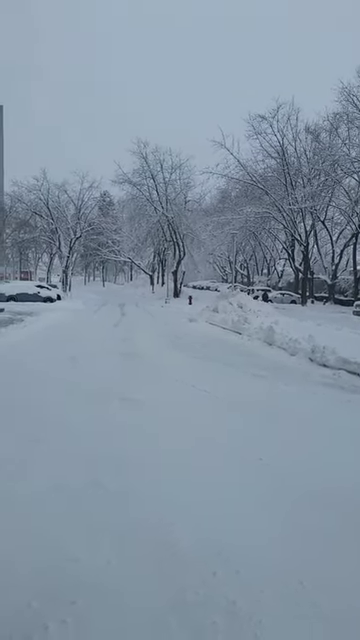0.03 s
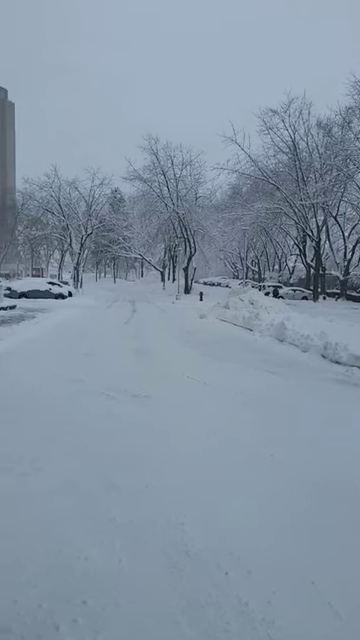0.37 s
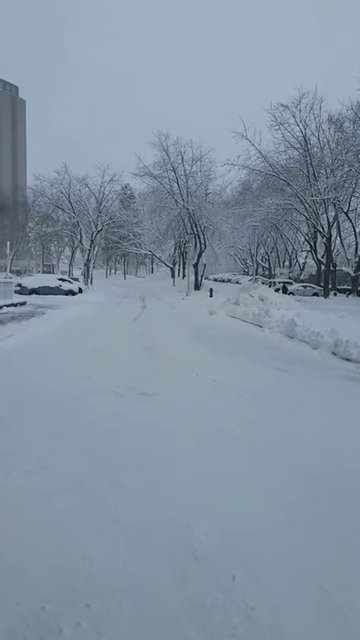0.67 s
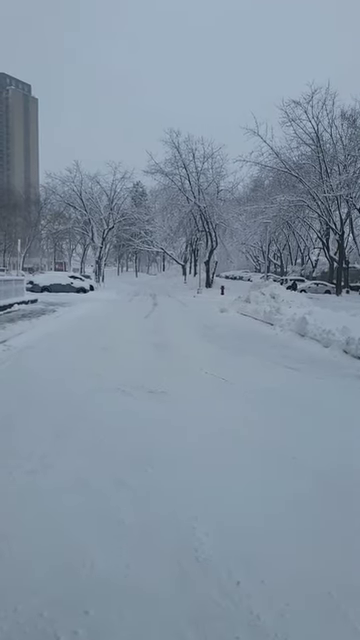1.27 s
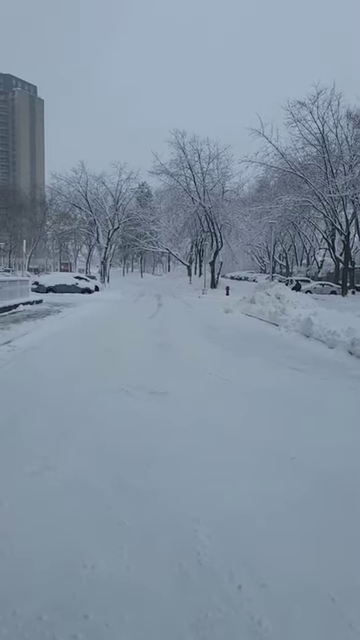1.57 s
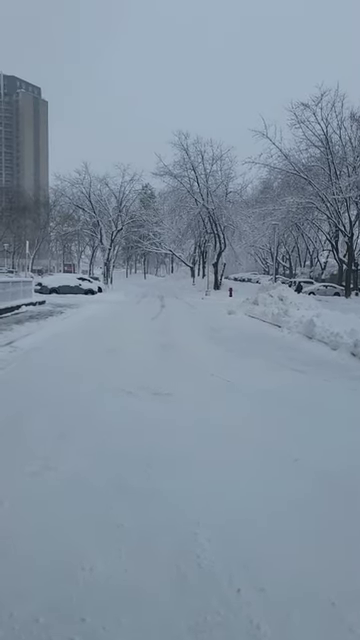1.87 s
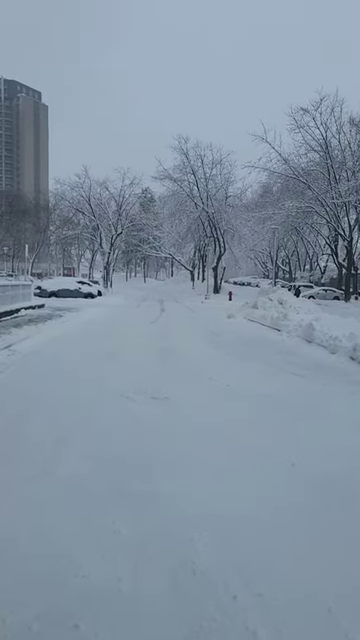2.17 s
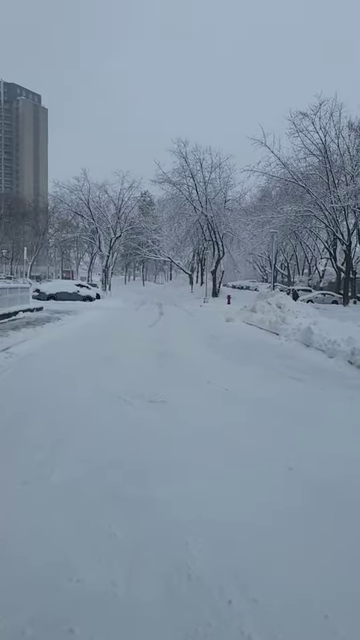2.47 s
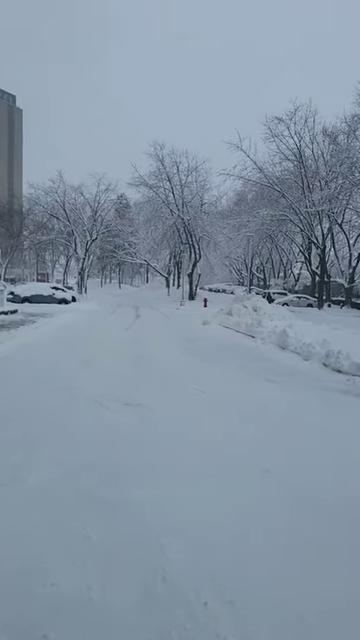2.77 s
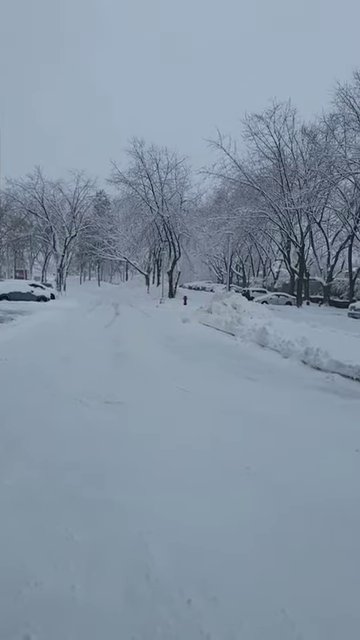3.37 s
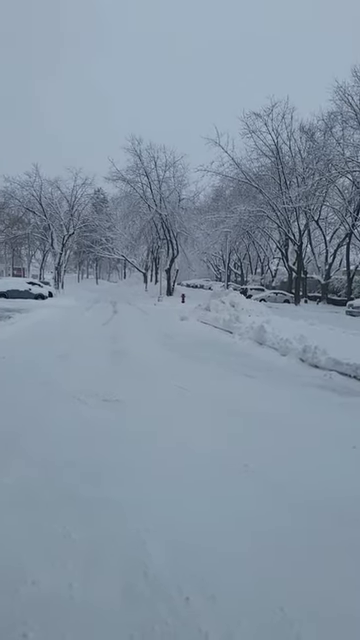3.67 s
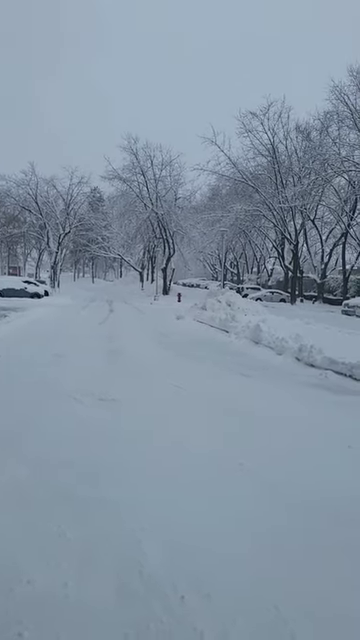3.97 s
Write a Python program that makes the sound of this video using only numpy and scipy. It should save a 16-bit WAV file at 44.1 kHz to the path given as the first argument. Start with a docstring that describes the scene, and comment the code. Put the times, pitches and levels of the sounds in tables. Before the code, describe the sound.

Wind buffets the microphone outdoors with a deep, uneven rumble and a rush that brightens in each gust. An opening gust settles, a faint double tick sounds close on the left, and later the wind swells again.

```python
"""Wind blows across a hand-held microphone on an open, snow-covered street.
Small eddies at the two ports make a rush, stronger on the windward left, that brightens in each gust.
Middle-sized eddies boom on the left; large ones reach both ports as a low rumble with short buffets.
A faint microphone hiss lies beneath, and one soft double tick sounds close by on the left."""
import sys
import numpy as np
from scipy import signal
from scipy.fft import rfft, irfft
from scipy.io import wavfile
from scipy.ndimage import uniform_filter1d

SR = 44100
rng = np.random.default_rng(int(sys.argv[2]) if len(sys.argv) > 2 else 0)


def store_wav(level_fs):
    """Save 16-bit WAV to argv[1]."""
    pcm = np.round(np.clip(np.atleast_2d(level_fs), -1, 1) * 32767)
    wavfile.write(sys.argv[1], SR, pcm.T.astype(np.int16))


N = 176400
T = np.arange(N) / SR
HZ = np.maximum(np.arange(N // 2 + 1) * SR / N, 1)
LEFT_ONLY = np.array([[1], [0]])

# wind strength at each port: (time [s], level [dB])
WIND_LEFT = [(0, 3.5), (.16, 4), (.42, 5), (.625, 2.5), (.648, -1), (.78, 0), (.97, -1), (1.2, 1.4),
             (1.4, .3), (1.6, -0.8), (1.86, -1), (2.03, -2.5), (2.28, -0.7), (2.52, 1.8), (2.64, -0.4),
             (2.86, 1.4), (2.97, 5), (3.12, 5.5), (3.22, 4.5), (3.28, 2.3), (3.42, 1.5), (3.49, 1.6),
             (3.68, -0.2), (4, 0.8)]
WIND_RIGHT = [(0, 4.8), (.25, 3.5), (.47, 3), (.8, 0), (1.4, 0), (1.85, -1), (2.2, -2), (2.5, -0.5),
              (3.12, -1), (3.55, -2), (3.8, 0.1), (4, 1.5)]
# tone of the rush with the wind at 0 dB: (frequency [Hz], left [dB/Hz], right [dB/Hz])
RUSH_SPECTRUM = [(66, -56, -56), (132, -47, -52), (216, -48.5, -48.5), (250, -49.5, -53.5),
                 (390, -48.5, -56), (477, -52.5, -61), (591, -58, -66.5), (694, -58.5, -70),
                 (958, -67, -75.5), (1460, -74, -85), (2126, -78.5, -90.5), (3340, -90, -101.6),
                 (4600, -94.5, -105.2), (5140, -98.5, -109), (5970, -106.5, -116.5), (9400, -119.5, -128),
                 (15000, -130, -138)]
# how hard each band rides the wind: (frequency [Hz], response [dB per dB of wind])
GUST_RESPONSE = [(125, -0.3), (400, 0.63), (800, 1.09), (2000, 1.06), (4000, 1.65), (8000, 1.5)]
# how alike the wind sounds at the two ports: (frequency [Hz], correlation [0 to 1])
PORT_CORRELATION = [(30, 0.19), (65, 0.8), (130, 0.22), (210, 0.46), (350, 0.18), (700, 0.03),
                    (3000, 0.032)]
# base tone of the large eddies: (frequency [Hz], left [dB/Hz], right [dB/Hz])
RUMBLE_SPECTRUM = [(25, -64, -64.5), (40.8, -49, -56.5), (61.7, -43, -46.5), (87, -43.5, -47.5),
                   (126.3, -52, -57.5), (206, -66, -68.5)]
# rise and fall of the rumble: (time [s], left gain [dB], right gain [dB])
RUMBLE_ENVELOPE = [(0, 2.5, 8), (.08, 7.5, 8.5), (.29, 4.5, 1.5), (.35, -3.5, 1), (.57, 5, -1.5),
                   (.72, -7.5, -1), (.8, -1, -3), (.9, 1, -0.5), (1.2, -1, 4), (1.54, -1, -6.5),
                   (1.72, -1.5, -11), (1.9, 2, 4.5), (2.08, 0, -1), (2.22, -3.5, 2.5), (2.3, 6, 7),
                   (2.55, 5, 1), (2.62, -5, -3), (2.8, -3, -1), (3.05, 3, -2.5), (3.35, 2, 3.5),
                   (3.52, 5.5, 6.5), (3.85, 3, 6.5), (4, -2, -2)]
# single large eddies hitting the ports: (time [s], added rumble gain [dB])
BUFFET_HITS = [(.205, 1.5), (.296, 3), (1.001, -0.5), (1.241, 4), (1.417, 8.5), (1.676, 9), (1.796, 8),
               (1.976, 2.5), (2.691, 9.5), (3.226, 3), (3.341, 3), (3.786, 3), (3.966, 9)]
# noise floor of the microphone: (frequency [Hz], left [dB/Hz], right [dB/Hz])
HISS_SPECTRUM = [(1000, -110.2, -110.3), (7000, -110.4, -111.4), (15000, -111.1, -112.1)]
# booms of middle-sized eddies: (time [s], peak level [dB], Gaussian half-width [s])
BOOM_SWELLS = [(.17, -23.5, 0.077), (.39, -19.5, 0.052), (1.207, -23, 0.036), (2.45, -24, .05),
               (2.682, -26, 0.056), (3.15, -24, 0.084)]
# the double tick: (time [s], level [dB])
TICK_HITS = [(.715, -49), (.738, -54)]


def from_db(db):
    """Decibels to gain."""
    return 10 ** (np.asarray(db) / 20)


def in_time(rows):
    """Each column of an envelope at every sample."""
    times, *columns = np.transpose(rows)
    return np.array([np.interp(T, times, column) for column in columns])


def at_hz(rows, hz):
    """Each column of a table, read on a log-frequency axis."""
    points, *columns = np.transpose(rows)
    return np.array([np.interp(np.log(hz), np.log(points), column) for column in columns])


def drift(rate_hz):
    """A slow random wobble for each port, with a standard deviation of 1."""
    wobble = irfft(rfft(rng.standard_normal((2, N))) / (1 + (HZ / rate_hz) ** 2), N)
    return wobble / wobble.std(axis=1, keepdims=True)


def port_spectrum(tone, correlation):
    """Spectrum of stereo noise with a given tone; the mid/side balance sets the correlation."""
    mid, side = rfft(rng.standard_normal((2, N)))
    pair = np.sqrt(1 + correlation) * mid + np.sqrt(1 - correlation) * side * np.array([[1], [-1]])
    return pair * from_db(at_hz(tone, HZ)) * np.sqrt(SR) / 2


def band_noise(centre_hz, width_hz, steepness):
    """Mono noise in one band."""
    detune = 2 * (HZ - centre_hz) / width_hz
    return irfft(rfft(rng.standard_normal(N)) / (1 + detune ** steepness), N)


def compress(noise, amount=0.56, window_s=0.045):
    """Partly levels the chance swells of a noise, so that it rolls on."""
    power = np.mean(abs(signal.hilbert(noise)) ** 2, axis=0)
    power = uniform_filter1d(power, int(window_s * SR) + 1)
    return noise * (power / power.mean()) ** (-amount / 2)


def rush(flutter_db=0.31, flicker_db=0.33):
    """Small eddies, octave by octave: a gust lifts the treble most and dips the bass slightly."""
    wind_db = np.vstack([in_time(WIND_LEFT), in_time(WIND_RIGHT)])
    wind_db += flutter_db * drift(rate_hz=8.7)   # unsteady flow at each port
    spectrum = port_spectrum(RUSH_SPECTRUM, at_hz(PORT_CORRELATION, HZ))
    centres_hz = 125 * 2. ** np.arange(7)
    mix = 0
    for hz, solo in zip(centres_hz, np.eye(len(centres_hz))):
        crossover = np.interp(np.log(HZ), np.log(centres_hz), solo)
        band = irfft(spectrum * crossover, N)
        gain_db = at_hz(GUST_RESPONSE, hz) * wind_db + flicker_db * drift(rate_hz=17)
        mix = mix + band * from_db(gain_db)
    return mix


def rumble(top_hz=220, buffet_half_width_s=0.013):
    """Large eddies press on both ports; each buffet is a brief swell."""
    spectrum = port_spectrum(RUMBLE_SPECTRUM, at_hz(PORT_CORRELATION, HZ))
    low_pass = 1 / np.sqrt(1 + (HZ / top_hz) ** 12)   # sixth order
    bed = compress(irfft(spectrum * low_pass, N))
    buffet_db = sum(db * np.exp(-.5 * ((T - s) / buffet_half_width_s) ** 2) for s, db in BUFFET_HITS)
    return bed * from_db(in_time(RUMBLE_ENVELOPE) + buffet_db)


def microphone_hiss():
    """The microphone's own steady noise, independent on each side."""
    return irfft(port_spectrum(HISS_SPECTRUM, correlation=0), N)


def booms():
    """Middle-sized eddies swell on the windward port, low and hollow."""
    body = compress(band_noise(centre_hz=144, width_hz=122, steepness=4)[None])
    envelope = sum(from_db(db) * np.exp(-.5 * ((T - s) / width) ** 2) for s, db, width in BOOM_SWELLS)
    return body / body.std() * envelope * LEFT_ONLY


def ticks(decay_s=0.01):
    """Two short, dying bursts of noise in one bright resonance, panned hard left."""
    ring = band_noise(centre_hz=3660, width_hz=1100, steepness=2)
    envelope = sum(from_db(db) * (T >= s) * np.exp(-abs(T - s) / decay_s) for s, db in TICK_HITS)
    return ring / ring.std() * envelope * LEFT_ONLY


def scene():
    """Three layers of wind and the double tick, over the microphone's hiss."""
    return rush() + rumble() + booms() + ticks() + microphone_hiss()


def record(dry):
    """The microphone drops the deepest bass; the ends get short fades and the top a steep cut."""
    low_cut = signal.butter(8, 32.7, "high", fs=SR, output="sos")
    high_cut = signal.ellip(10, .1, 80, 15500, fs=SR, output="sos")
    fades = np.clip(np.minimum(T, T[-1] - T) / .003, 0, 1)   # 3 ms in and out
    return signal.sosfilt(high_cut, signal.sosfilt(low_cut, dry) * fades)


dry = scene()
out = record(dry)
store_wav(out)
```